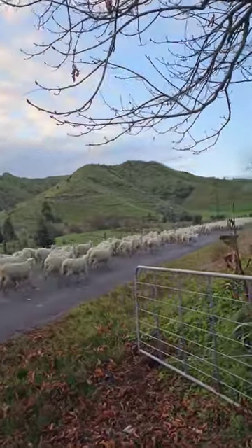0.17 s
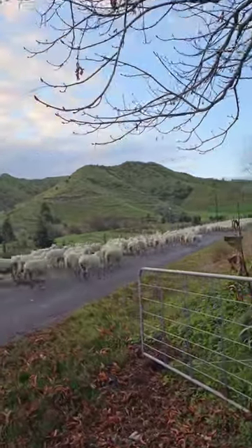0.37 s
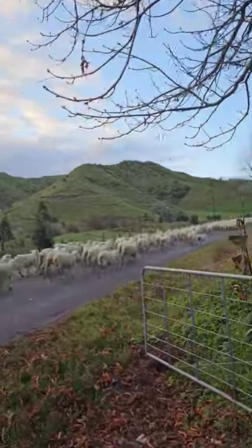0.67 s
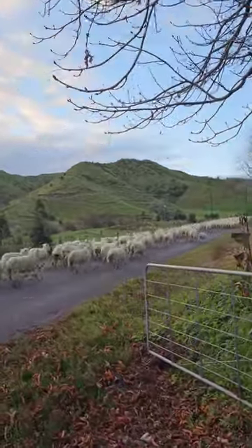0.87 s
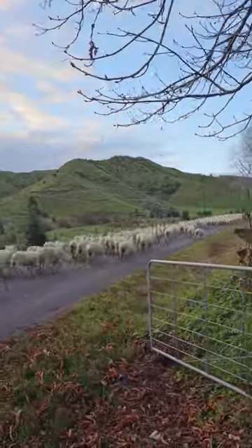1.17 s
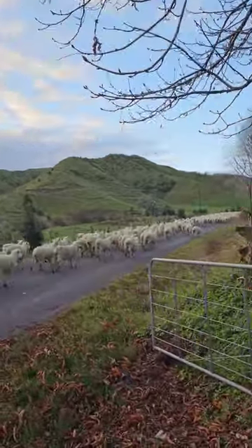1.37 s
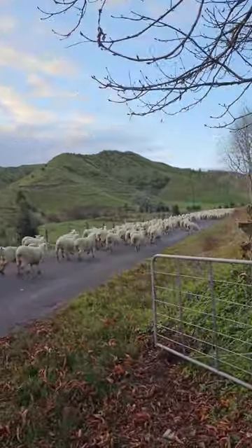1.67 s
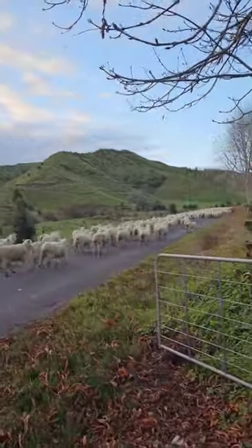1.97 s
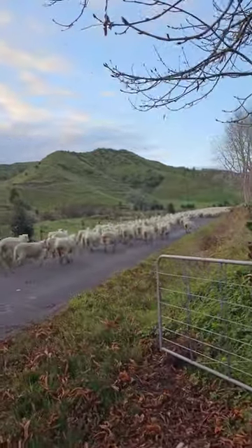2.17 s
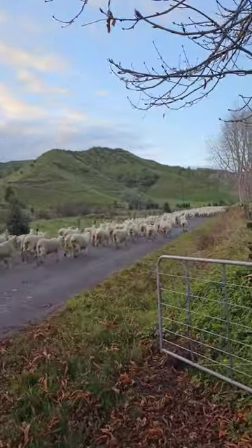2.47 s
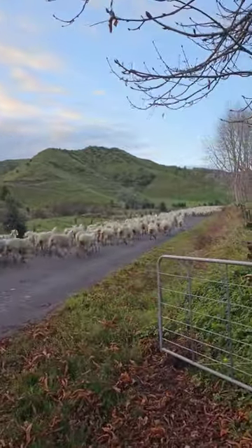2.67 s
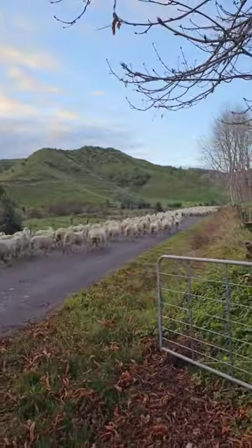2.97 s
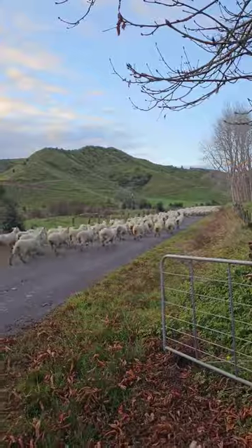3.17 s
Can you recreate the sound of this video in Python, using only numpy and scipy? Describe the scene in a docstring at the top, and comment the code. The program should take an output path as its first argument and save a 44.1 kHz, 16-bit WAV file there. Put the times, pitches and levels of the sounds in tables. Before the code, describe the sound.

A large flock of sheep trots along a paved country road, hooves pattering over low wind rumble and a faint engine hum. Close on the right come gritty scuffs and three clusters of dry knocks, the last loudest.

```python
"""A large flock of sheep trots along a sealed country road. From the start, wind rumbles and an engine
slowly picks up speed under hundreds of small hooves, which patter over a wash of shuffling.
Almost at once, gritty scuffs join in close on the right, then dry knocks and a soft swish.
The knocks bunch up near 0.3 s and 1.3 s and hit hardest near 2.25 s, while the flock grows
a little louder toward the end."""
import sys
import numpy as np
from scipy import signal
from scipy.fft import rfft, irfft, next_fast_len
from scipy.io import wavfile
from scipy.ndimage import map_coordinates

SR = 44100
rng = np.random.default_rng(int(sys.argv[2]) if len(sys.argv) > 2 else 0)


def put_to_file(sound):
    """Save the sound as 16-bit audio at rate SR, in the file named by the first command-line argument."""
    columns = np.atleast_2d(sound).T  # one column per channel
    safe = np.clip(columns, -1, 1)
    whole_steps = np.round(safe * 32767)
    wavfile.write(sys.argv[1], SR, whole_steps.astype(np.int16))


N = 145971
T = np.arange(N) / SR
FLOCK_LAG_S, NEAR_LAG_S = .00011, .00051  # left-side delay: flock just right of centre, close sounds far right


def amp(db):
    """Decibels to gain."""
    return 10 ** (np.asarray(db) / 20)


def unit(x):
    """Scale to rms 1."""
    return x / np.sqrt(np.mean(x ** 2) + 1e-20)


def along(points, hz):
    """Read (Hz, value) points on a log axis."""
    freqs, values = np.transpose(points)
    return np.interp(np.log(hz + 1), np.log(freqs + 1), values)


def automation(points):
    """Read (seconds, value) points at every sample."""
    return np.interp(T, *np.transpose(points))


def wobble(rate):
    """A smooth random curve, rate knots a second."""
    return map_coordinates(rng.standard_normal(int(N * rate / SR) + 4), [T * rate])


def filtered(x, response):
    """Filter x by a complex response of frequency."""
    size = x.shape[-1]
    padded = next_fast_len(size + size // 2)
    return irfft(rfft(x, padded) * response(np.fft.rfftfreq(padded, 1 / SR)), padded)[..., :size]


def coloured(x, colour):
    """x through an EQ curve, at rms 1."""
    return unit(filtered(x, lambda hz: amp(along(colour, hz))))


def from_right(x, lag_s, left_db=0):
    """Pan right: the left side comes late, with its own gain."""
    left = filtered(x, lambda hz: np.exp(-2j * np.pi * hz * lag_s))
    return np.array([amp(left_db) * left, x])


def diffuse(colour, likeness):
    """Stereo noise of rms 1 with a given left-right likeness."""
    def mid_side_gains(hz):
        angle = np.arccos(np.clip(along(likeness, hz), -1, 1)) / 2
        return np.array([np.cos(angle), np.sin(angle)])
    mid, side = filtered(rng.standard_normal((2, N)), mid_side_gains)
    return coloured(np.array([mid + side, mid - side]), colour)


def add(track, s, sound):
    """Mix a short sound into the track at time s."""
    part = track[:, max(0, round(s * SR)):][:, :sound.shape[1]]
    part += sound[:, :part.shape[1]]


def swing(t, hz, cycles):
    """A tone that swells over the given number of cycles, then dies away."""
    age = t * hz / cycles
    return age * np.exp(1 - age) * np.sin(2 * np.pi * hz * t)


def step_envelope(size, grit_db, tick_decay_s=.0007, grit_rise_s=.0031, grit_decay_s=.0047):
    """A sharp tick halfway through, with grit that crunches before and after it."""
    t = (np.arange(size) - size // 2) / SR
    tick = (t >= 0) * np.exp(-abs(t) / tick_decay_s)
    grit = np.exp(-abs(t) / np.where(t < 0, grit_rise_s, grit_decay_s))
    return tick + amp(grit_db) * grit


def grains(hz, per_s, cycles, scatter=.05, spread_db=3.5, size=512):
    """Tiny rings at random times, scattered in pitch and strength, at rms 1."""
    track, t = np.zeros((1, N)), np.arange(size) / SR
    for when, strength, detune in rng.random((int(per_s * N / SR), 3)):
        pitch = hz * (detune / (1 - detune)) ** scatter
        gain = amp(spread_db * min(-np.log(1 - strength), 2))
        add(track, when * N / SR, gain * swing(t, pitch, cycles)[None])
    return unit(track[0])


def swells(rows):
    """An envelope of bell-shaped fades in and out."""
    return sum(amp(db) * np.exp(-.5 * ((T - s) / half) ** 2) for s, half, db in rows)


# The wind's EQ. Each row: frequency in Hz, gain in dB.
WIND_EQ = [(12, -33), (25, -21), (38, -10), (52, -3.5), (66, -1), (85, -4), (115, -13), (150, -17),
           (190, -18.5), (250, -21), (330, -28.5), (500, -33.5), (900, -69)]
# The wind's fader. Each row: time in seconds, level in dB.
WIND_FADER = [(0, -42.5), (.35, -39.5), (.6, -42), (1.0, -40), (1.4, -41.5), (2.15, -39), (2.4, -40.5),
              (2.65, -38.5), (3.3, -40)]


def wind(trim_db=1):
    """A low bed of wind rumble, nearly mono."""
    return amp(automation(WIND_FADER) + trim_db) * diffuse(WIND_EQ, likeness=[(100, .993)])


# The engine's slow climb. Each row: time in seconds, speed in cycles per second.
ENGINE_SPEED = [(0, 28.1), (1, 30.35), (2, 32.6), (2.7, 33.9), (3.3, 34.95)]
# The drone's fader. Each row: time in seconds, level in dB.
ENGINE_FADER = [(0, -49.5), (1, -46.5), (2, -45.5), (3.3, -45)]
# The drone's partials. Each row: multiple of the engine speed, level in dB.
ENGINE_ORDERS = [(2, -6), (3, -14), (4, 0), (5, -7.5)]


def engine(waver_db=1.5):
    """Only the low orders of the engine carry this far; they climb with its speed."""
    phase = 2 * np.pi * np.cumsum(automation(ENGINE_SPEED)) / SR
    hum = np.zeros(N)
    for order, db in ENGINE_ORDERS:
        gain = amp(db + waver_db * wobble(7.37))
        hum += gain * np.sin(order * phase + 2 * np.pi * rng.random())
    return np.sqrt(2) * amp(automation(ENGINE_FADER)) * hum


# The background hiss's EQ. Each row: frequency in Hz, gain in dB.
HISS_EQ = [(400, 6.5), (1400, 5.5), (3000, -2), (6000, 2), (7700, -7), (9000, 2), (10400, -20),
           (11600, -3.5), (12800, -15), (15500, -5.5)]


def hiss(level_db=-59.5):
    """A faint, steady background hiss, leaning slightly left."""
    return amp(level_db) * amp([[.5], [-.5]]) * coloured(rng.standard_normal((2, N)), HISS_EQ)


# The patter's tone, with resonances near 1.3, 3 and 7.5 kHz. Each row: frequency in Hz, gain in dB.
PATTER_EQ = [(150, -55), (300, -5), (520, 11), (800, 2), (1300, 5.5), (1800, 1.5), (2300, -1), (3000, 5),
             (3900, -2), (5000, -2), (6400, -7), (7600, -3.5), (8800, -16), (15000, -10)]


def patter(count=900, tint_db=5.5, spread_db=2.6, lag_spread_s=.00003, size=2048):
    """Each near hoof is a tick and a trace of grit, with its own strength, tint and direction."""
    hz = np.fft.rfftfreq(size, 1 / SR)
    ticks = rng.standard_normal((count, size)) * step_envelope(size, grit_db=-13)
    when, strength, tint, direction = rng.random((4, count, 1))
    ripple_db = tint_db * np.sin(2 * np.log(hz + 1) + 2 * np.pi * tint)
    accent_db = spread_db * np.minimum(-np.log(1 - strength), 2.6)
    lag_s = FLOCK_LAG_S + lag_spread_s * (2 * direction - 1)
    right = rfft(ticks) * amp(ripple_db + accent_db)
    left = right * np.exp(-2j * np.pi * hz * lag_s)
    hooves = irfft(np.stack([left, right], axis=1))
    track = np.zeros((2, N + size))  # pre-roll, so the patter is already under way
    for s, hoof in zip(when[:, 0] * (N + size) / SR, hooves):
        add(track, s, hoof)
    return coloured(track[:, size:], PATTER_EQ)


# The tone of the far flock. Each row: frequency in Hz, gain in dB.
SHUFFLE_EQ = [(120, 10), (300, -2), (500, 2), (850, 2), (1350, 1), (1700, -3), (2400, -3.5), (3100, -1),
              (4200, -4.5), (6300, -9.5), (7300, -5.5), (8100, -5.5), (8600, -9.5), (11600, -10.5),
              (15500, -17.5)]
# Its stereo image, wide in the treble. Each row: frequency in Hz, left-right likeness (1 is mono).
SHUFFLE_IMAGE = [(200, 0.43), (500, 0.66), (900, 0.13), (1400, 0.12), (2500, -0.031), (6000, -0.0014)]


def shuffle(swell_db=2.54, grain_db=1.72):
    """Far hooves blur into a restless, grainy wash."""
    flutter_db = swell_db * wobble(21.89) + grain_db * wobble(170)
    return amp(flutter_db) * diffuse(SHUFFLE_EQ, SHUFFLE_IMAGE)


# Two layers of light tapping. Each row: pitch in Hz, taps per second, level in dB.
TAP_LAYERS = [(1350, 160, -65.5), (3160, 170, -62)]


def taps():
    """Hoof tips ring very briefly on the stones of the road."""
    rings = sum(amp(db) * grains(hz, per_s, cycles=1.4) for hz, per_s, db in TAP_LAYERS)
    return from_right(rings, FLOCK_LAG_S, left_db=-3.5)


# Bright hoof accents. Each row: time in seconds, level in dB, pitch in Hz, half width in octaves.
CLICK_CUES = [(0.047, -46, 2980, 0.18), (.074, -45, 2570, .4), (.152, -53, 4000, 1.3),
              (0.324, -48, 3200, .25), (.665, -42, 1200, 0.54), (0.7107, -47.5, 7300, 0.1),
              (0.7537, -39, 3700, 0.33), (.828, -44.5, 7400, 0.15), (0.842, -47, 7450, 0.17),
              (.9190, -43, 3080, 0.34), (1.0153, -44, 1490, .7), (1.1007, -43.5, 7260, 0.13),
              (1.132, -42, 3300, 0.44), (1.1640, -39.5, 3100, 0.23), (1.3060, -39, 3940, .45),
              (1.393, -40, 3180, 0.44), (1.4845, -45, 3220, 0.66), (1.5240, -48, 1220, 0.27),
              (1.697, -34.5, 3270, 0.22), (1.746, -34, 3700, 0.24), (1.857, -41.5, 4400, 0.36),
              (1.95, -45.5, 3120, 2.2), (2.081, -41.5, 3580, 0.52), (2.153, -41.5, 7000, 0.8),
              (2.3863, -32.5, 4200, 0.22), (2.385, -37.5, 7740, 0.35), (2.6650, -39, 7600, 1.4),
              (2.668, -38, 2940, .2), (2.775, -46, 2470, 0.81), (2.8650, -37.5, 2900, 0.73),
              (2.879, -39.5, 2680, .5), (2.982, -42, 2850, 0.49), (3.0460, -37.5, 2900, 0.74),
              (3.084, -40, 2670, .27), (3.1144, -36.5, 3570, 0.77), (3.1560, -40, 2500, 0.15),
              (3.185, -46, 2900, 0.28), (3.2311, -39, 7900, .9)]


def clicks(trim_db=-2.5, span_s=.003, size=2048):
    """Harder steps and snapping grit cut through the patter."""
    track = np.zeros((2, N))
    for s, db, pitch, width in CLICK_CUES:
        burst = rng.standard_normal(size) * step_envelope(size, grit_db=-20)
        click = filtered(burst, lambda hz: 1 / (1 + (np.log2((hz + 1) / pitch) / width) ** 2))
        click *= np.sqrt(span_s * SR) / np.linalg.norm(click)  # the energy of span_s at rms 1
        add(track, s - size / 2 / SR, amp(db + trim_db) * from_right(click, FLOCK_LAG_S))
    return track


# Close scuffs. Each row: start in seconds, length in seconds, level in dB.
SCUFF_CUES = [(0.084, 0.089, -49), (0.2, 0.12, -61), (1.04, 0.075, -50), (1.136, 0.054, -52),
              (1.286, 0.03, -44), (1.382, 0.034, -48.5), (1.7313, 0.016, -34.5), (1.755, 0.0059, -51),
              (1.798, 0.045, -50), (2.048, 0.017, -46.5), (2.113, 0.066, -49), (2.282, 0.036, -45),
              (2.357, 0.011, -44.5), (2.448, 0.025, -43.5), (2.49, 0.025, -43.5), (2.602, 0.021, -45),
              (2.796, 0.02, -55), (3.224, 0.016, -49)]
# Their gritty tone. Each row: frequency in Hz, gain in dB.
SCUFF_EQ = [(100, -7), (350, 7), (600, 5.5), (1300, 0.5), (2400, -0.5), (4200, 0.5), (6000, -4.5),
            (7800, -2.5), (10000, -12), (15500, -7.5)]


def scuffs(attack_s=.0012, release_s=.0074, grain_db=3.5):
    """Grainy rubs close by: a quick attack, a hold and a short release."""
    envelope = np.zeros(N)
    for s, length, db in SCUFF_CUES:
        attack = np.clip((T - s) / attack_s, 0, 1)
        release = np.exp(-np.maximum(T - s - length, 0) / release_s)
        envelope += amp(db) * attack * release
    grit = coloured(rng.standard_normal(N) * amp(grain_db * wobble(900)), SCUFF_EQ)
    return from_right(envelope * grit, NEAR_LAG_S, left_db=-7.5)


# Dull footfalls. Each row: start in seconds, level in dB, pitch in Hz.
THUD_CUES = [(.181, -44.5, 300), (.432, -37.5, 220), (0.552, -38.5, 220), (0.784, -39.5, 236),
             (.893, -41, 520), (1.012, -37, 243), (1.106, -42, 233), (1.185, -40, 490), (1.738, -37, 510),
             (1.815, -47, 520), (2.102, -37, 225), (2.145, -43, 200), (2.865, -37, 550), (2.941, -39, 201),
             (3.031, -43, 233), (3.077, -36.5, 456)]


def thuds(size=2048):
    """Heavier steps push the ground for a few slow cycles."""
    track, t = np.zeros((2, N)), np.arange(size) / SR
    for s, db, pitch in THUD_CUES:
        add(track, s, amp(db) * from_right(swing(t, pitch, cycles=.62), FLOCK_LAG_S))
    return track


# Dry, close knocks. Each row: start in seconds, level in dB, pitch in Hz, attack in cycles.
KNOCK_CUES = [(0.234, -35, 1850, 0.62), (0.266, -31.5, 2030, 0.62), (0.3051, -25.5, 1290, 0.84),
              (0.374, -39, 1450, 0.71), (0.3962, -28, 1480, 0.38), (1.0805, -29, 1040, 0.24),
              (1.2139, -38, 1190, 0.78), (1.2593, -19, 1100, 0.65), (1.3003, -22.5, 1160, 0.92),
              (1.3153, -21, 1180, 0.89), (1.324, -28, 1230, 0.79), (1.348, -35, 1230, 0.53),
              (1.3593, -24.5, 1240, 0.92), (1.647, -31.5, 800, 0.4), (1.6888, -26.5, 1330, 0.26),
              (2.0832, -27.5, 1200, 0.55), (2.134, -24.5, 1210, 0.32), (2.1522, -33, 1460, 0.56),
              (2.162, -24, 1150, 0.33), (2.166, -28, 1540, 0.61), (2.17, -29, 1480, 0.58),
              (2.1900, -25.5, 1460, 0.3), (2.2180, -26.5, 1300, 0.56), (2.2555, -10.5, 1480, 0.52),
              (2.4525, -31, 1210, 0.77), (2.606, -29, 1400, 0.3), (2.6170, -34, 850, 0.81),
              (3.1159, -29, 1340, 0.73)]


def knocks(trim_db=-1, crack_hz=6000, tail_s=.0035, size=1536):
    """Each soft contact swings for a few cycles, with a weak overtone, thump, crack and tail."""
    track, t = np.zeros((2, N)), np.arange(size) / SR
    for s, db, pitch, attack in KNOCK_CUES:
        soften = signal.butter(N=4, Wn=pitch * 1.86, fs=SR, output="sos")
        body = signal.sosfilt(soften, swing(t, pitch, attack))
        overtone = amp(-22.5) * swing(t, pitch * 2.54, 2 * attack)
        thump = amp(-21.5) * swing(t, hz=630, cycles=.21)
        burst = np.exp(-t * pitch / attack) * rng.standard_normal(size)
        crack = amp(-21) * filtered(burst, lambda hz: 1 / (1 + 1j * hz / crack_hz))
        dark_noise = coloured(rng.standard_normal((2, size)), [(200, 4), (1400, -7), (6000, -24)])
        tail = amp(-21) * dark_noise * np.exp(-t / tail_s)
        hit = from_right(body + overtone + thump + crack, NEAR_LAG_S, left_db=-3)
        add(track, s, amp(db + trim_db) * (hit + tail))
    return track


# Crunch under the knock clusters. Each row: centre in seconds, half length in seconds, level in dB.
CRUNCH_CUES = [(.3, 0.078, -53.5), (1.33, 0.052, -50), (2.18, 0.033, -48)]


def crunches():
    """Swells of tiny knocks fill the gaps between the clear ones."""
    crunch = swells(CRUNCH_CUES) * grains(hz=1300, per_s=280, cycles=.53)
    return from_right(crunch, NEAR_LAG_S, left_db=-3)


# Soft swishes. Each row: centre in seconds, half length in seconds, level in dB.
SWISH_CUES = [(0.52, 0.067, -50), (0.815, 0.011, -54), (2.49, 0.055, -48)]
# Their airy tone. Each row: frequency in Hz, gain in dB.
SWISH_EQ = [(2000, -34), (5000, 6.5), (9000, 3.5), (15000, 8)]


def swishes():
    """Soft swells of high hiss, like cloth sliding, leaning right."""
    return swells(SWISH_CUES) * coloured(rng.standard_normal((2, N)), SWISH_EQ) * amp([[-3], [0]])


# The fader for patter and shuffle. Each row: time in seconds, level in dB.
FLOCK_FADER = [(0, -56.5), (.15, -56), (.45, -55), (.72, -56.5), (.85, -54), (.97, -55.5), (1.17, -53.5),
               (1.38, -52), (1.45, -56.5), (1.63, -55), (1.85, -52), (1.98, -52), (2.1, -52), (2.24, -54),
               (2.5, -51.5), (2.8, -50.5), (2.92, -52.5), (3.15, -52), (3.3, -53)]
# The flock's balance. Each row: frequency in Hz, level of right over left in dB.
FLOCK_BALANCE = [(250, -1), (700, -0.5), (1400, 1.5), (3000, 2), (4300, 6.5), (6300, 6.5), (7700, 11),
                 (9300, -2), (11500, 8), (15000, 3)]


def flock_bus():
    """Patter, shuffle, clicks and thuds together, with most of the treble leaning right."""
    bed = amp(1.56) * shuffle() + amp(.28) * patter()
    steps = amp(automation(FLOCK_FADER)) * bed + clicks() + thuds()
    return filtered(steps, lambda hz: amp(along(FLOCK_BALANCE, hz) * np.array([[-.5], [.5]])))


def scene():
    """The flock and the close sounds over hiss, engine and wind."""
    foreground = flock_bus() + knocks() + scuffs() + swishes()
    ambience = hiss() + (engine() + wind()) * amp([[.2], [-.2]])
    return foreground + ambience + taps() + crunches()


def record(dry, top_hz=15650):
    """A brick-wall high cut on the whole mix."""
    return filtered(dry, lambda hz: hz < top_hz)


dry = scene()
out = record(dry)
put_to_file(out)
```